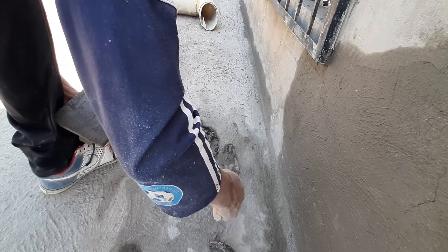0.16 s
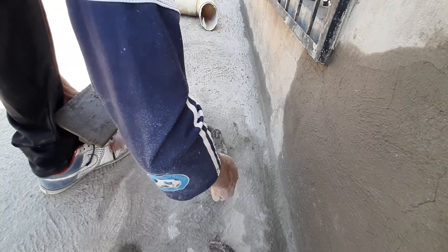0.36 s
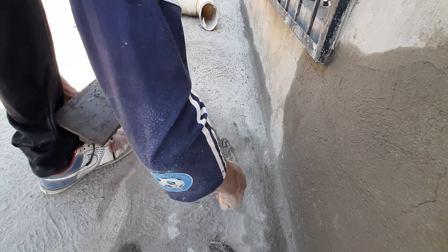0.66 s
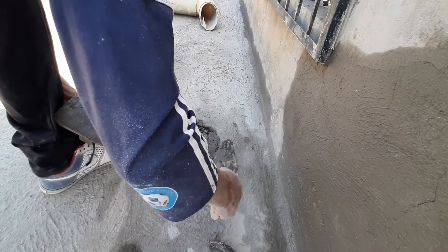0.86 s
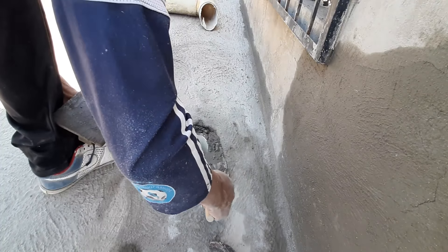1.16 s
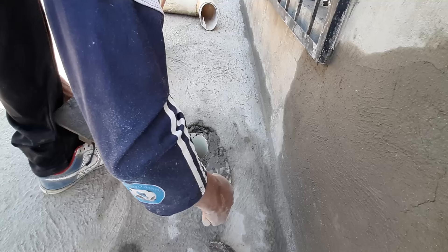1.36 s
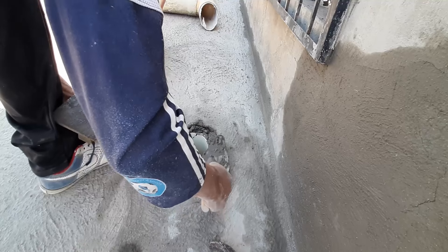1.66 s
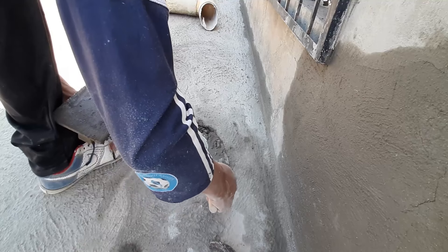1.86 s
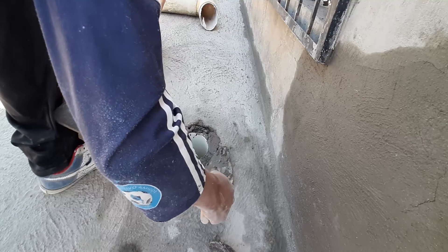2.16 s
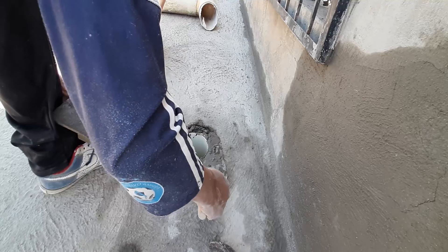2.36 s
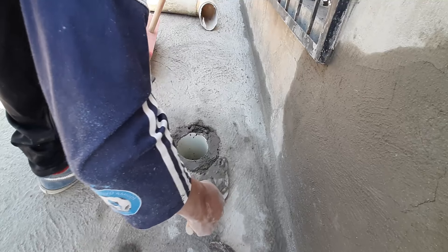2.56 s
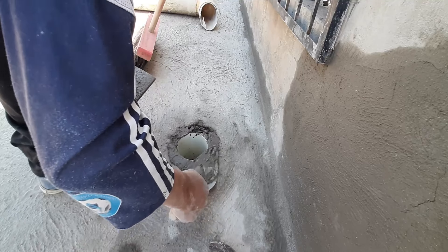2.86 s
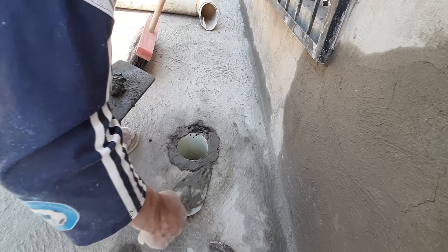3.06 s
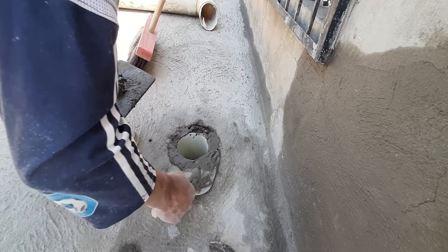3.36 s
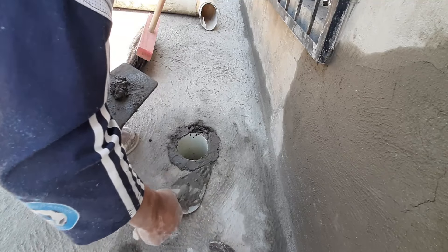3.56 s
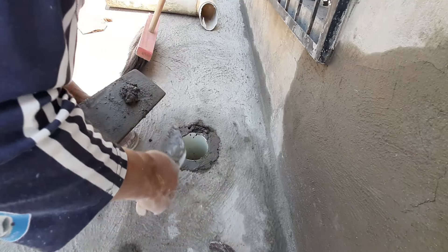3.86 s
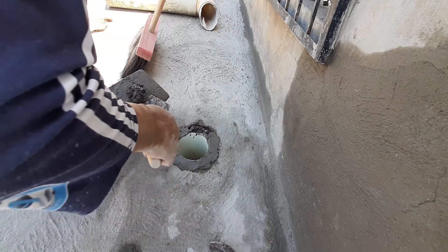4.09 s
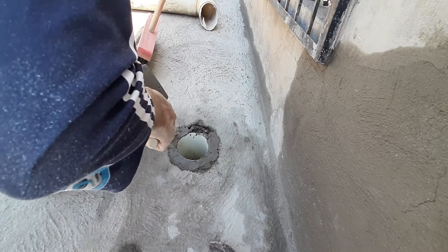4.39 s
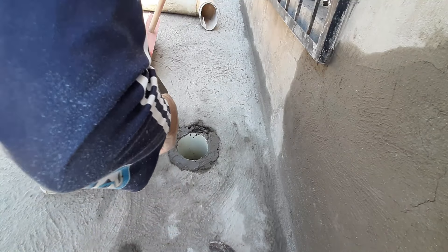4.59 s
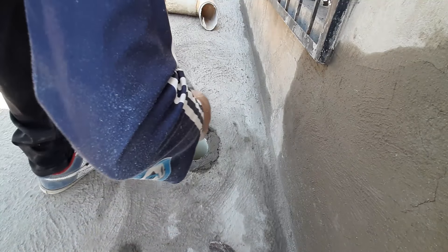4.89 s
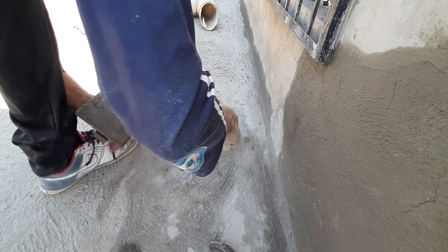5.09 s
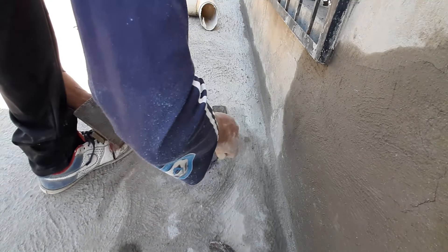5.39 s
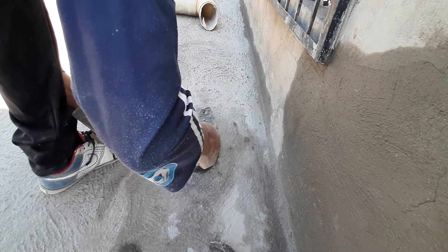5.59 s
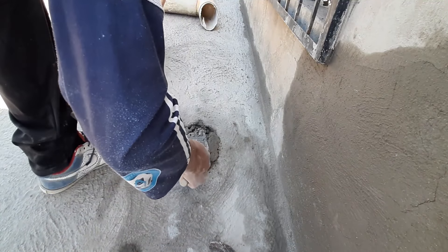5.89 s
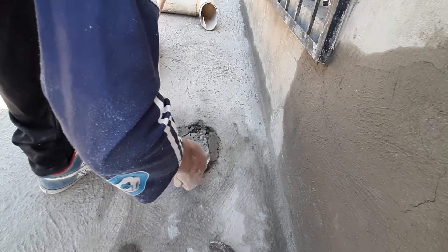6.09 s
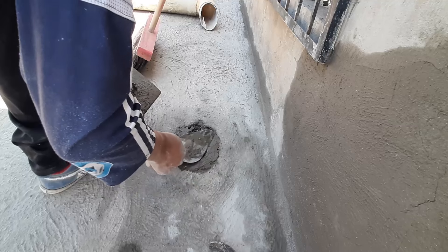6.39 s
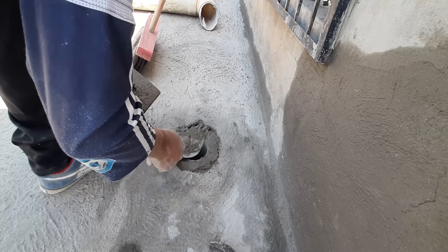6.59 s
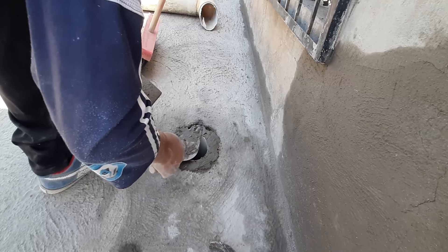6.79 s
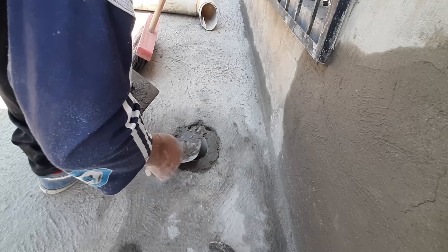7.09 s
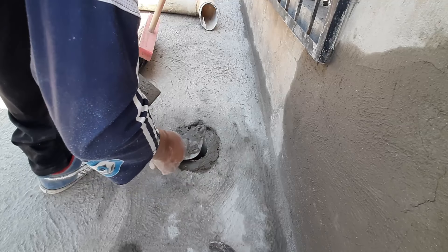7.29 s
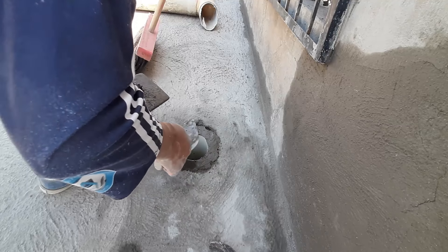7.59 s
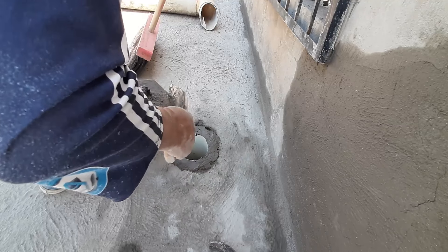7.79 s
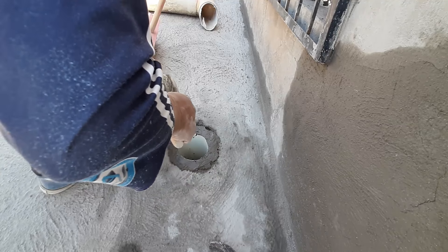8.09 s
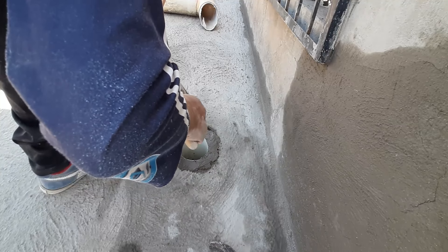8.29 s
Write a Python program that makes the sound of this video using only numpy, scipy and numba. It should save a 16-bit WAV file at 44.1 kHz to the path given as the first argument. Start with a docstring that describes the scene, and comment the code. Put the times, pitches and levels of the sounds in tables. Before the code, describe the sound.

Gritty trowel strokes come one after another with brief gaps, stones snagging the blade in sharp clicks and squeals. The strongest, brightest scrapes fall between two and four seconds; one light stroke follows, then a longer gap, then hissier scrapes and taps on a pipe rim with low hollow resonance. A few soft thuds occur close by. Phone stereo pickup, a metre away in an open yard, with quiet low rumble.

```python
"""A yard floor with a drain pipe in it: a steel trowel scrapes wet mortar round the pipe, a metre from
a phone with two microphone ports. Sand grains drag under the blade and set its modes ringing, larger
stones catch its edge, and the open pipe's air hoots when the blade works over it. Close by are dull
knocks of hand and feet; a short yard echo, a distant rumble and a faint far hiss lie under it all."""
import sys
import numpy as np
from scipy import signal
from scipy.fft import rfft, irfft, next_fast_len
from scipy.io import wavfile
from scipy.ndimage import uniform_filter1d
from numba import njit

SR = 44100
rng = np.random.default_rng(int(sys.argv[2]) if len(sys.argv) > 2 else 0)


def bounce(signal):
    """Save signal as a 16-bit WAV file at the path given by the first command-line argument."""
    frames = np.transpose(np.atleast_2d(signal))
    limited = np.clip(frames, -1, 1)
    pcm = np.round(limited * 32767).astype(np.int16)
    wavfile.write(sys.argv[1], SR, pcm)


N = 372644  # samples

# Far bed of traffic and air. Each row: frequency in Hz, relative level in dB per Hz.
RUMBLE_COLOUR = [(28, -26.5), (58, -0.5), (108, -2.5), (202, -9.5), (309, -12), (397, -24.5), (496, -20),
                 (637, -22.5), (1520, -34), (1730, -48.5), (8960, -59), (15500, -51.5)]
RUMBLE_DB = -50.5  # typical level of the part shared by both ports
# Faint far hiss between 1.4 and 2 kHz that dies away. Each row: time in seconds, level in dB.
FAR_HISS = [(2.502, -78), (4.2, -89.5)]
# Strokes of the trowel. Each row: start in seconds, end in seconds, time to land in seconds,
# drag once landed in dB, drag before the lift in dB, share of bending modes in dB, share of upper modes
# in dB, share of fine sand hiss in dB, centre of the grit's colour in Hz, share of the pipe's hoot in dB,
# pitch of the first bending mode in Hz. Drags and shares are relative drives.
STROKES = [(0.0, 0.154, 0.00047, -42, -56.5, -10, -1.5, -14, 5220, -42, 1536),
           (0.444, 0.754, 0.085, -46, -47, -10, 2.5, 0, 5100, -38, 1690),
           (1.084, 1.425, 0.0044, -55.5, -37.5, -5.5, -5, -16.5, 4630, -20, 1684),
           (1.428, 1.6, 0.065, -49, -47, -7.5, -0.5, -18, 4430, -16, 1620),
           (1.803, 2.12, 0.037, -42.5, -34.5, -8, -2, -3, 4650, -31, 1660),
           (2.393, 2.676, 0.0029, -43, -37, -8, -2, -13.5, 4000, -24, 1670),
           (2.946, 3.178, 0.0037, -45.5, -32.5, -8, -3, -10, 4550, -27, 1620),
           (3.451, 3.709, 0.0036, -37.5, -65, -8, -1, -9, 3030, -42, 1640),
           (4.221, 4.678, .003, -53, -59.5, -8.5, -11, -4, 6780, -2, 1600),
           (5.724, 6.126, 0.09, -53, -59, -17, -3, 5, 3640, 0.5, 1676),
           (6.35, 6.664, 0.077, -46.5, -48, -12, -10, -7.5, 3200, -0.5, 1646),
           (6.682, 7.071, 0.026, -44, -53, -17, -4.5, 0, 3170, -6.5, 1620),
           (7.238, 7.521, 0.073, -38.5, -49, -21, -5, 2.5, 4740, 0, 1650),
           (8.168, 8.454, 0.048, -56, -64, -12, -14.5, -11, 1930, -8.5, 1624)]
# Stones catching the edge. Each row: time in seconds, push on the blade in dB, push on the bending modes
# in dB, pitch that rings most in Hz.
CATCHES = [(0.004, -35, -37, 2500), (0.021, -29, -38.5, 2410), (0.0366, -24.5, -30.5, 2440),
           (0.044, -28, -41, 4430), (0.0853, -33, -62, 4470), (0.114, -28, -60, 4530),
           (0.131, -31, -46.5, 4400), (0.499, -39, -55, 5930), (0.542, -25.5, -31, 5780),
           (0.622, -32, -46, 5400), (0.631, -42, -46, 5870), (0.692, -25.5, -36, 5950),
           (0.7124, -26.5, -35.5, 4800), (1.089, -41, -54, 6350), (1.228, -29, -40, 4900),
           (1.334, -30.5, -53, 4230), (1.437, -46, -58, 5250), (1.496, -38.5, -53, 5070),
           (1.5558, -29, -34.5, 4500), (1.9147, -25.5, -30.5, 6060), (1.957, -26, -58, 4500),
           (2.007, -22, -29.5, 4430), (2.064, -25.5, -34.5, 4370), (2.393, -30, -36, 4360),
           (2.425, -27, -31, 3320), (2.4528, -24.5, -26, 3500), (2.5022, -17.5, -27, 4410),
           (2.5864, -18.5, -51, 3330), (2.602, -24, -37, 4300), (2.9496, -28, -48, 4680),
           (3.0402, -19, -23.5, 3140), (3.049, -16.5, -27.5, 2940), (3.085, -22, -34, 2950),
           (3.118, -42, -28.5, 3540), (3.4525, -37, -18.5, 4950), (3.488, -18, -20, 5510),
           (3.542, -21, -22.5, 5270), (3.5607, -18.5, -23, 3020), (3.6, -17, -27, 2970),
           (3.6656, -21, -34.5, 2950), (4.2199, -46, -58, 2400), (4.3052, -34.5, -61, 6980),
           (4.535, -46.5, -67, 5260), (4.626, -42.5, -50, 4300), (5.731, -37, -54, 3350),
           (5.801, -37, -69, 3520), (5.923, -42.5, -62, 3530), (6.0195, -31.5, -53, 4400),
           (6.051, -40.5, -49, 4260), (6.4162, -32.5, -45, 5430), (6.5, -20, -40, 4030),
           (6.533, -20, -49, 3960), (6.545, -24.5, -39, 3900), (6.585, -30, -54, 2970),
           (6.692, -40, -62, 3920), (6.871, -27, -68, 3050), (6.92, -25.5, -56, 2950),
           (7.28, -44, -51, 3760), (7.3131, -26.5, -42, 4210), (7.466, -35, -66.5, 3430),
           (8.3, -29, -49, 2400), (8.318, -30, -59, 4880)]
# Sand grit under the edge. Each row: frequency in Hz, relative level in dB per Hz.
GRIT_COLOUR = [(1100, -13), (2300, -4.5), (7000, -6), (9000, -12.5)]
# Fine sand hiss. Each row: frequency in Hz, relative level in dB per Hz.
HISS_COLOUR = [(7000, -15.5), (9200, -8), (15500, -3)]
# Mortar and floor under the blade. Each row: frequency in Hz, relative level in dB per Hz.
SLAB_COLOUR = [(60, -14), (250, 2), (900, -11.5), (1300, -9), (2000, -40)]
# First bending modes of the blade, retuned together by each stroke. Each row: untuned pitch in Hz,
# width in Hz, relative level in dB, left minus right in dB before the final balance.
BENDING_MODES = [(1660, 110, 0.5, 7), (1871, 120, -7.5, 2)]
# Upper modes of the blade. Each row: mean pitch in Hz, width in Hz, relative level in dB,
# left minus right in dB before the final balance.
UPPER_MODES = [(2467, 120, -2, 1.64), (2950, 34, -6, -3.7), (3352, 70, -5.5, -3.5), (3534, 70, -6.5, -1.5),
               (4402, 100, -0.5, 1.6), (5324, 99, -3, 3), (5755, 190, -1.5, -1.5), (7213, 120, -4, 0.4)]
# Air in the pipe, retuned together by each tap. Each row: untuned pitch in Hz, width in Hz, level in dB.
PIPE_MODES = [(451, 35, -1), (549, 140, -10)]
# Taps on the pipe's rim. Each row: time in seconds, push in dB, pitch of the lower hoot in Hz.
RIM_TAPS = [(5.737, -40, 423), (6.021, -45, 438), (6.054, -41, 443), (6.416, -36.5, 450), (6.442, -37, 480),
            (6.472, -38, 466), (6.505, -36, 456), (6.528, -33, 466), (6.563, -35, 448), (6.705, -40, 430),
            (6.744, -37, 446), (6.919, -39, 420), (6.98, -37, 420), (7.284, -30, 468), (7.308, -33, 490)]
# Dull knocks of hand and feet near the phone. Each row: time in seconds, level before the onset and
# port balance in dB, pitch in Hz.
KNOCKS = [(2.099, -32, 83), (3.057, -28, 135), (3.113, -26.5, 94.8), (8.273, -21, 58.4),
          (8.354, -26.5, 112)]
# A lower mode of the lightly loaded blade. Each row: start in seconds, end in seconds, drive in dB,
# pitch in Hz.
FREE_MODES = [(3.648, 3.702, -53, 1240), (5.71, 5.858, -68.5, 1255), (8.2, 8.401, -58.5, 1354)]

LAND_DB, LIFT_DB = -23, -20.5  # gain at the first touch and at the lift
LIFT_S, LET_GO_S = 0.048, 0.0085  # easing before the lift, falling silent after it
# the blade bears down harder just before and after each stone
BEAR_DB, BEAR_BEND_DB = -14, -10  # relative to the stone's push
BEAR_RISE_S, BEAR_FALL_S = .007, 0.044  # time constants
DRIFT, DRIFT_PER_S = .007, 12.  # share of pitch per unit of random walk, new levels per second
YARD_T60_S, YARD_DB = .27, -26.5  # tail before it is dulled, level relative to the direct sound
TOP_HZ = 15600  # upper limit of the phone


def undb(db):
    """Amplitude gain of a level in dB."""
    return np.exp(np.asarray(db) * (np.log(10) / 20))


def unit(x):
    """Scale to an RMS of one."""
    return x / np.sqrt(np.mean(x ** 2))


def walk(rate):
    """Random levels drawn rate times a second with straight slides between; spread near 1.3."""
    k = int(SR / rate)
    levels = np.repeat(rng.standard_normal(N // k + 1), k)
    return 1.59 * uniform_filter1d(levels, k)[:N]


def colour(x, points):
    """Shape a spectrum by (Hz, dB) points, with straight lines over log frequency."""
    hz, db = np.transpose(points)
    size = next_fast_len(N)
    f = np.maximum(np.fft.rfftfreq(size, 1 / SR), 1)
    gain = undb(np.interp(np.log(f), np.log(hz), db))
    return irfft(rfft(x, size) * gain, size)[..., :N]


def between(x, lo_hz, hi_hz):
    """Steep band-pass."""
    return signal.sosfilt(signal.butter(3, [lo_hz, hi_hz], "band", fs=SR, output="sos"), x)


def held(starts):
    """Index of the latest start at every sample; the first one also covers the time before it."""
    return np.maximum(np.searchsorted(starts, np.arange(N) / SR, "right") - 1, 0)


@njit
def spin(x, step, pole):
    """One rotating, fading state; its speed is renewed every 32 samples."""
    out, z, p = np.empty(len(x), np.complex128), 0j, 0j
    for i in range(len(x)):
        if i % 32 == 0:
            p = pole * np.exp(1j * step[i])
        z = z * p + x[i] + 1e-18
        out[i] = z
    return out


def mode(x, hz, width_hz):
    """Complex ringing of one resonance whose pitch may move; each part keeps a white input's power."""
    pole = np.exp(-width_hz * np.pi / SR)
    step = 2 * np.pi / SR * hz * np.ones(len(x))
    return np.sqrt(2 - 2 * pole ** 2) * spin(1. * x, step, pole)


def rumble():
    """Far traffic and air: the bass is alike on both ports and swells slowly; a faint hiss joins it."""
    mid, side = (colour(rng.standard_normal(N), RUMBLE_COLOUR) for _ in range(2))
    # little difference between the ports in the bass
    side = colour(side, [(40, -3), (90, -8), (160, -13), (300, -14), (600, -3), (1500, 0)])
    ports = (mid + side * np.array([[1], [-1]])) / np.std(mid)
    swell = undb(RUMBLE_DB + 1.4 * walk(2.2))
    hiss_gain = undb(np.interp(np.arange(N) / SR, *np.transpose(FAR_HISS)))
    far_hiss = unit(between(rng.standard_normal((2, N)), 1400, 2000)) * hiss_gain
    return swell * ports * undb([[.6], [-.6]]) + far_hiss


def contact():
    """Gain of each stroke's edges (landing, lift) and the drag that slides between them."""
    edge, drag, t = np.zeros(N), np.zeros(N), np.arange(N) / SR
    for start, end, land_s, landed_db, lifting_db, *_ in STROKES:
        on = (t >= start) & (t <= end + LET_GO_S)
        corners = [start, start + land_s, end - LIFT_S, end, end + LET_GO_S]
        edge[on] = undb(np.interp(t[on], corners, [LAND_DB, 0, 0, LIFT_DB, 3 * LIFT_DB]))
        drag[on] = undb(np.interp(t[on], corners[1:3], [landed_db, lifting_db]))
    return edge, drag


def blows(column):
    """One sharp push, a single sample long, at each stone."""
    kick = np.zeros(N)
    for row in CATCHES:
        kick[int(row[0] * SR)] = undb(row[column])
    return kick


def crunch(kick, rise_s=0.0022, fall_s=0.006):
    """Force envelope after each push: a quick rise, a few milliseconds of crushing."""
    t = np.arange(int(.06 * SR)) / SR
    envelope = (1 - np.exp(-t / rise_s)) * np.exp(-t / fall_s)
    return np.abs(signal.fftconvolve(kick, envelope)[:N])


def ease(power, fall_s):
    """Power that fades after each push; fall_s is the time constant of its amplitude."""
    return signal.lfilter([1], [1, -np.exp(-2 / (fall_s * SR))], power + 1e-18)


def bearing(kick):
    """Pressure that builds towards each stone and eases after it."""
    before = ease(kick[::-1] ** 2, BEAR_RISE_S)[::-1]
    after = ease(kick ** 2, BEAR_FALL_S)
    return np.sqrt(before + after)


def grains(per_s, spread_db):
    """Dense sand clicks, a few larger than the rest."""
    hit = rng.random(N) < per_s / SR
    size_db = np.minimum(spread_db * rng.exponential(size=N), 9)
    return unit(hit * rng.standard_normal(N) * undb(size_db))


def patchy(rough, patch_db):
    """Uneven grit: smooth random patches of its spectrum swell and fade over time."""
    cells = signal.stft(rough, nperseg=512)[2]
    patch = rng.standard_normal(cells.shape[1:])
    patch = uniform_filter1d(patch, size=4, axis=0)  # over frequency
    patch = uniform_filter1d(patch, size=5, axis=1)  # over time
    return signal.istft(cells * undb(patch_db * unit(patch)), nperseg=512)[1][:, :N]


def humped(rough, share):
    """Each stroke colours its grit round its own centre; share is width over centre pitch."""
    out = np.zeros_like(rough)
    edges = [int(row[0] * SR) for row in STROKES] + [N]
    for start, end, row in zip(edges, edges[1:], STROKES):
        centre_hz = row[8]
        out[:, start:end] = [mode(port[start:end], centre_hz, share * centre_hz).real for port in rough]
    return out


def ring(force, modes, wander_db, favour_db, apart, tune=1):
    """Blade modes: the last stone favours one for a while; each swells alone, out of step at the ports."""
    out, power = 0, sum(undb(2 * m[2]) for m in modes)
    caught_s, favoured_hz = np.transpose(CATCHES)[[0, 3]]
    last = held(caught_s)
    since_s = np.abs(np.arange(N) / SR - caught_s[last])
    fresh_db = favour_db * np.exp(-since_s / 0.38)
    for hz, width, db, pan_db in modes:
        # near 1 when the stone's pitch lies close to this mode
        picked = np.exp(-(np.log(favoured_hz / hz) / .06) ** 2)[last]
        drive = force * undb(db + wander_db * walk(20) + fresh_db * (picked - 0.32))
        z = mode(drive, hz * tune * (1 + DRIFT * walk(DRIFT_PER_S)), width)
        turn = apart + 0.62 * walk(3)  # phase between the ports in radians
        left = undb(pan_db / 2) * z.imag
        right = undb(-pan_db / 2) * (z.imag * np.cos(turn) + z.real * np.sin(turn))
        out = out + np.array([left, right])
    return out * np.sqrt(2 / power)


def chirp(force):
    """Each stone squeals briefly at its own pitch while it is crushed."""
    caught_s, stone_hz = np.transpose(CATCHES)[[0, 3]]
    z = mode(force, stone_hz[held(caught_s)], 170.0)
    return np.array([z.imag, 0.25 * z.imag + 0.54 * z.real])


def pipe(force):
    """The blade and rim taps excite the air column; each tap sets the hoot's pitch until the next."""
    tapped_s, tap_db, tap_hz = np.transpose(RIM_TAPS)
    tap = np.zeros(N)
    tap[(tapped_s * SR).astype(int)] = undb(tap_db)
    scrape = undb(1.0) * crunch(tap, rise_s=0.0034, fall_s=0.0098) * rng.standard_normal(N)
    drive = force + scrape + 6.1 * tap
    tune = tap_hz[held(tapped_s)] / PIPE_MODES[0][0]
    hoot = sum(undb(db) * mode(drive, hz * tune, width).imag for hz, width, db in PIPE_MODES)
    return between(hoot, 322, 780)


def trowel():
    """Stick-slip drag plus stone catches drive the blade, the grit, the slab, the fine hiss and the pipe."""
    slip = undb(0.5 * walk(60) + 1.0 * walk(220) - 3.0)
    catch, bend = blows(column=1), blows(column=2)
    crushed = crunch(catch)
    edge, drag = contact()
    stroke = held([row[0] for row in STROKES])
    bend_db, ring_db, hiss_db, _, hoot_db, bend_hz = np.transpose(STROKES)[5:, stroke]

    # forces on the blade and on its bending modes
    press = edge * np.hypot(drag, undb(BEAR_DB) * bearing(catch))
    bow = edge * np.hypot(drag * undb(bend_db), undb(BEAR_BEND_DB) * bearing(bend))
    push = np.hypot(slip * press, undb(-7.0) * crushed)
    flex = np.hypot(slip * bow, undb(-1.5) * crunch(bend))

    # each port hears its own patch of sand, plus grains common to both
    shared = grains(5000., 5.9)
    sand = 0.25 * shared + 1.0 * np.array([grains(7000., 4.2), grains(7000., 3.0)])
    rough = colour(sand * push, GRIT_COLOUR) / np.std(colour(sand[0], GRIT_COLOUR))
    grit = undb(-3.5) * patchy(rough, patch_db=5.0) + undb(-15.0) * humped(rough, share=0.27)
    hiss = colour(sand * push * undb(hiss_db), HISS_COLOUR) * undb([[-1.8], [1.8]])
    slab = undb(2.5) * colour((.5 * shared + 0.59 * sand) * push, SLAB_COLOUR)

    struck = (shared * push + 2.3 * catch) * undb(ring_db)
    upper = ring(struck, UPPER_MODES, wander_db=2.5, favour_db=11.5, apart=1.56)
    upper = between(upper, 2200, 11000)
    bowed = shared * flex + 5.6 * bend
    tune = bend_hz / BENDING_MODES[0][0]
    bending = ring(bowed, BENDING_MODES, wander_db=2.5, favour_db=0, apart=1.1, tune=tune)
    bending = between(bending, 1370, 2060)
    squeal = undb(-10.0) * chirp(shared * crushed)
    hoot = pipe(shared * push * undb(hoot_db - 5.0))
    blade = (upper + bending + grit + hiss + squeal) * undb([[.4], [-.4]])
    return blade + slab + hoot + lifted(shared)


def yard(x):
    """A diffuse tail off walls and gate, duller than the direct sound."""
    t = np.arange(int(.5 * SR)) / SR
    tail = rng.standard_normal((2, len(t))) * 1000 ** (-t / YARD_T60_S) * (t > .004)
    tail = signal.lfilter([1], [1, -.3], tail) / np.sqrt(np.sum(tail ** 2) / 2)
    return undb(YARD_DB) * signal.fftconvolve(x, tail, axes=1)[:, :N]


def knocks(t60_s=0.11):
    """Short low decaying swings close to the phone, stronger on the right port."""
    out, t = np.zeros(N), np.arange(int(.15 * SR)) / SR
    for s, db, hz in KNOCKS:
        i = int(s * SR)
        envelope = (1 - np.exp(-t / 0.0069)) * 1000 ** (-t / t60_s)
        swing = undb(db) * np.sin(2 * np.pi * hz * t) * envelope
        out[i:i + len(t)] += swing[:N - i]
    return out * undb([[-1.5], [1.5]])


def lifted(force):
    """A thin low mode, driven by grains, that sings while the blade is only lightly loaded."""
    t = np.arange(N) / SR
    sing = np.zeros(N)
    for start, end, db, hz in FREE_MODES:
        light = (t > start) & (t < end)
        sing += mode(force * undb(db) * light, hz, 17.7).imag
    return between(sing, 1183, 1596) * undb([[3], [-3]])


def scene():
    """The trowel and its yard echo, the knocks near the phone and the far bed, summed at two ports."""
    tool = trowel()
    return tool + yard(tool) + knocks() + rumble()


def record(dry):
    """The phone cuts the top with a steep low-pass."""
    return signal.sosfilt(signal.ellip(10, .2, 80, TOP_HZ, fs=SR, output="sos"), dry)


dry = scene()
out = record(dry)
bounce(out)
```